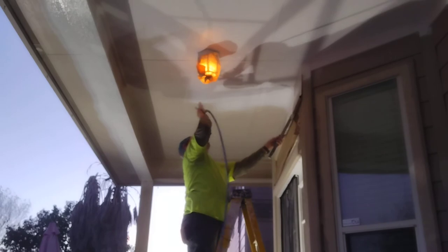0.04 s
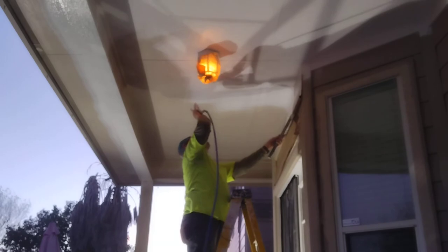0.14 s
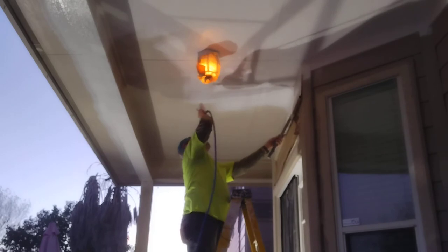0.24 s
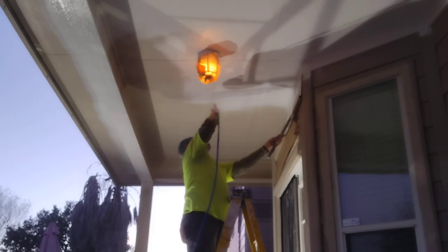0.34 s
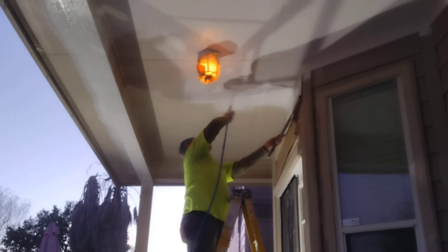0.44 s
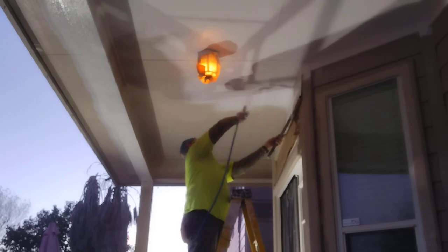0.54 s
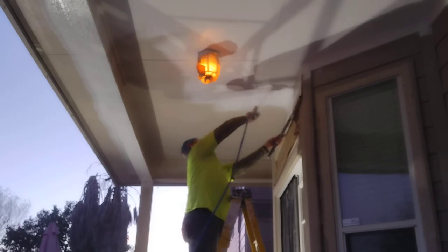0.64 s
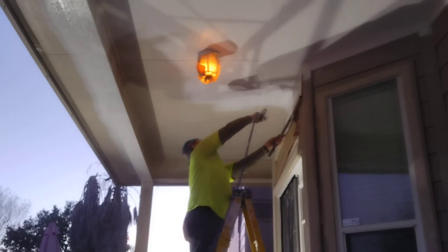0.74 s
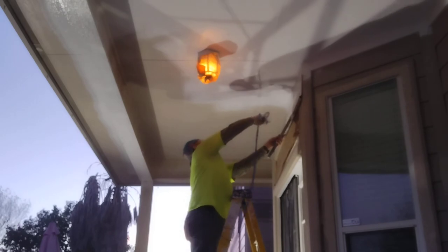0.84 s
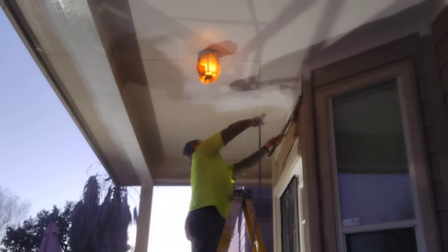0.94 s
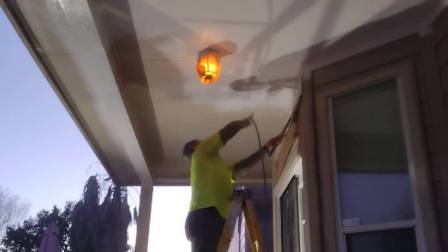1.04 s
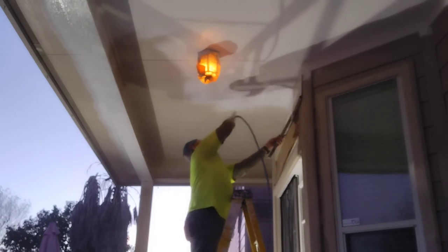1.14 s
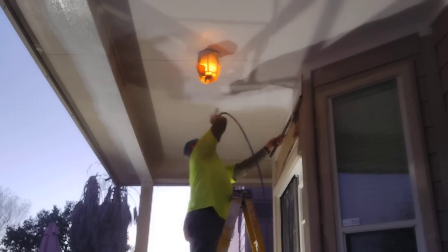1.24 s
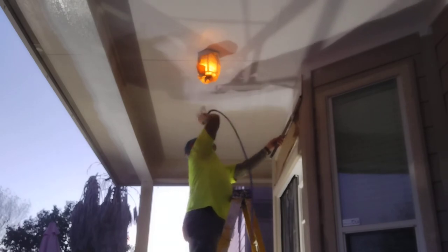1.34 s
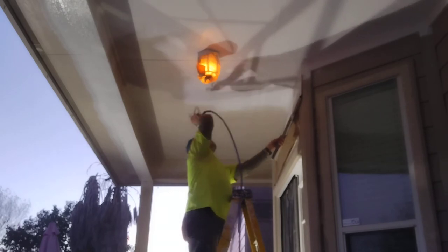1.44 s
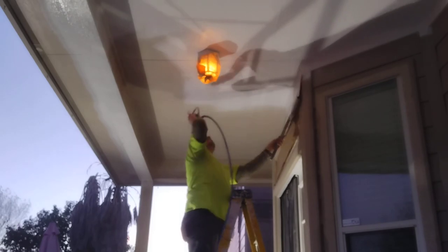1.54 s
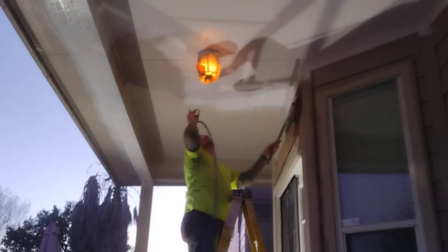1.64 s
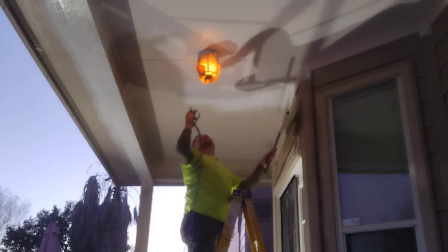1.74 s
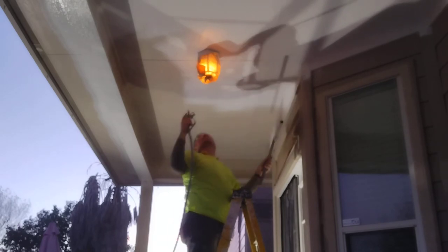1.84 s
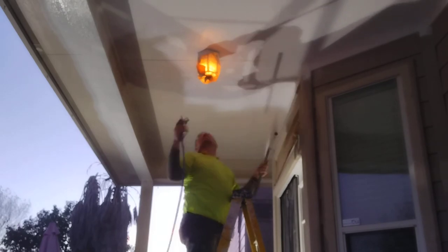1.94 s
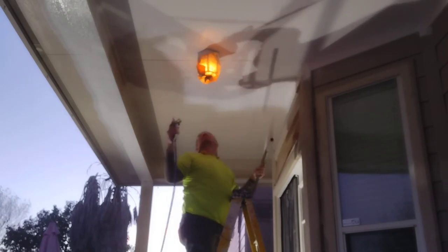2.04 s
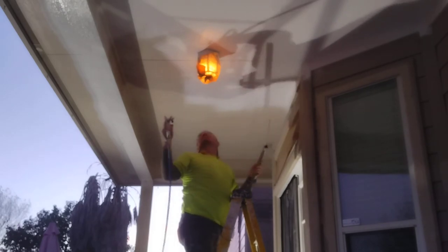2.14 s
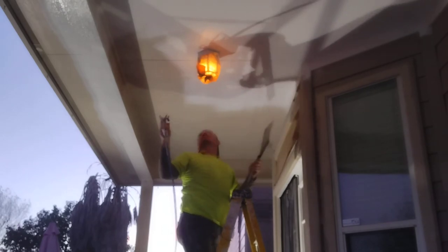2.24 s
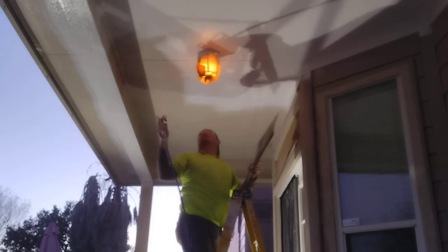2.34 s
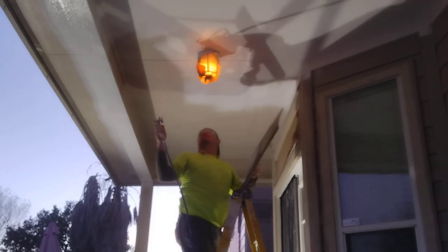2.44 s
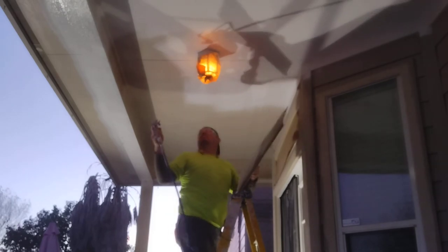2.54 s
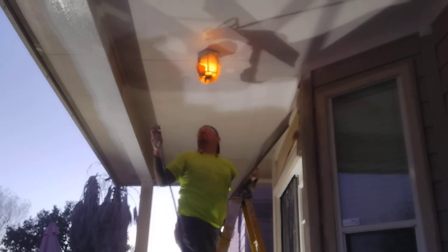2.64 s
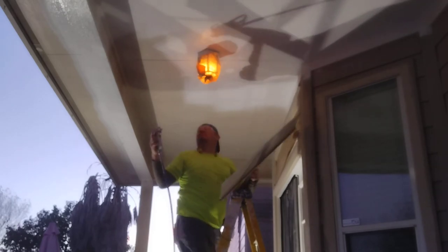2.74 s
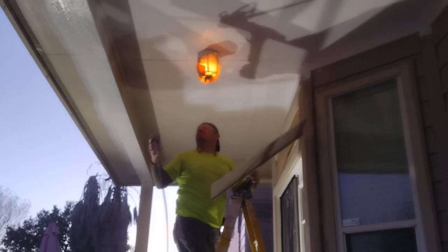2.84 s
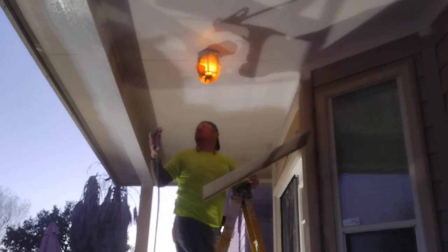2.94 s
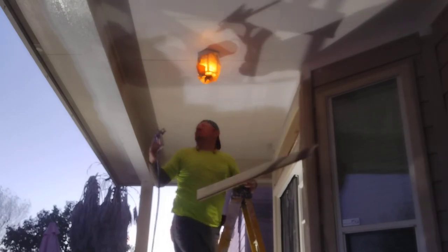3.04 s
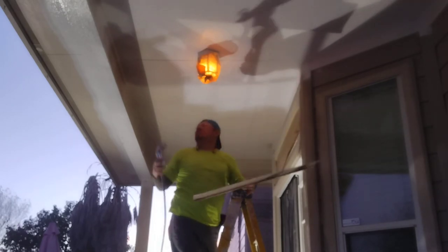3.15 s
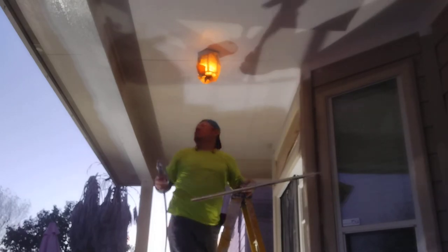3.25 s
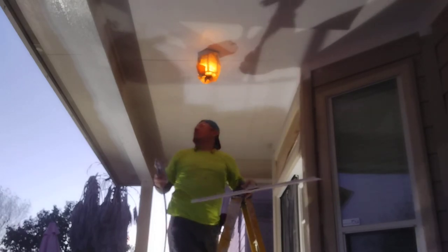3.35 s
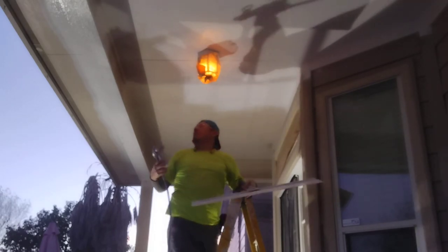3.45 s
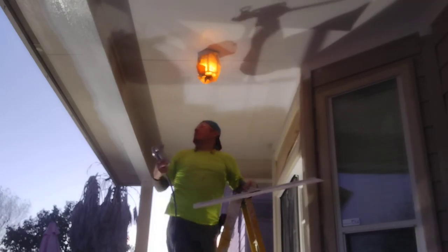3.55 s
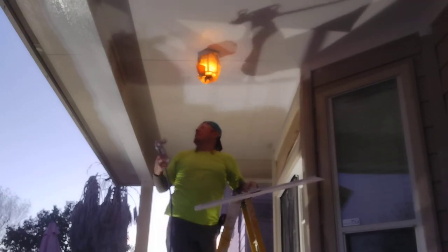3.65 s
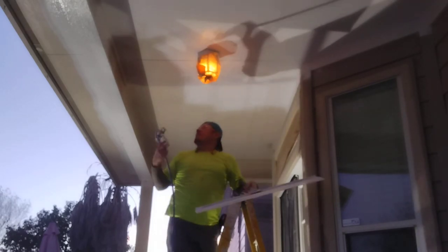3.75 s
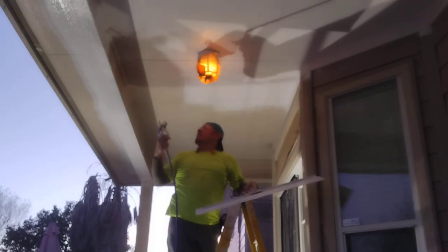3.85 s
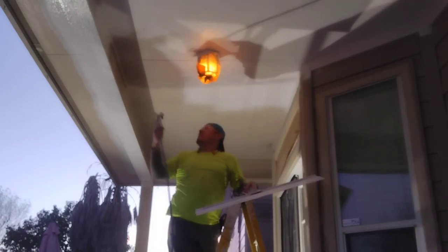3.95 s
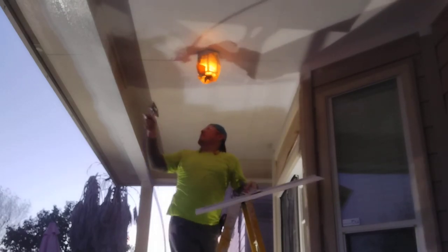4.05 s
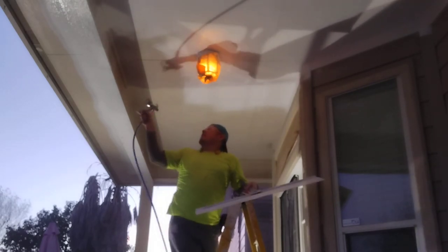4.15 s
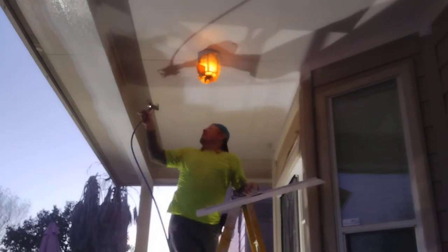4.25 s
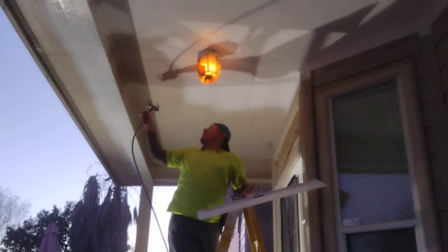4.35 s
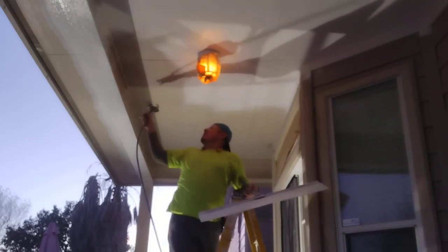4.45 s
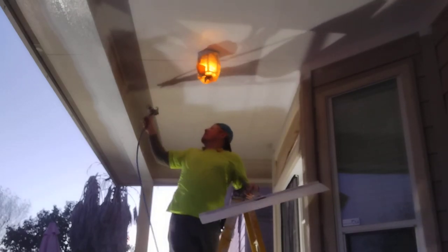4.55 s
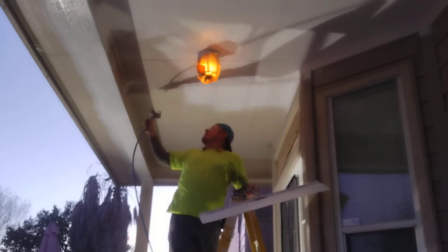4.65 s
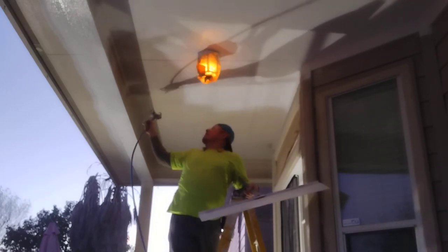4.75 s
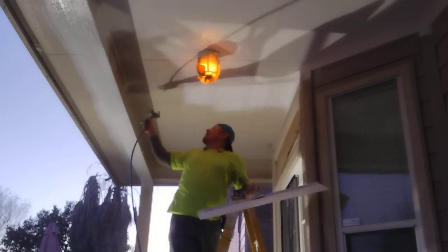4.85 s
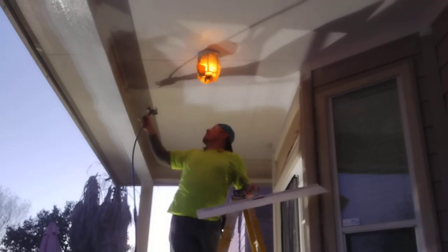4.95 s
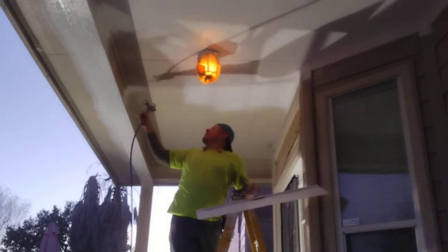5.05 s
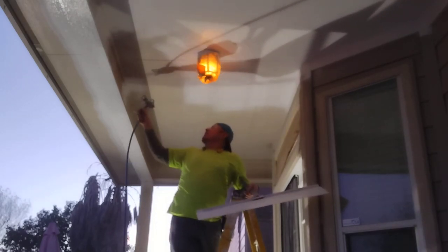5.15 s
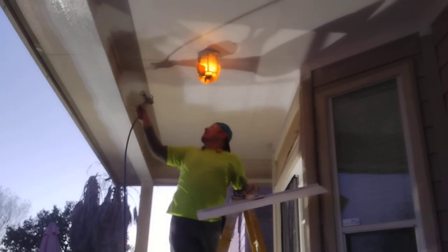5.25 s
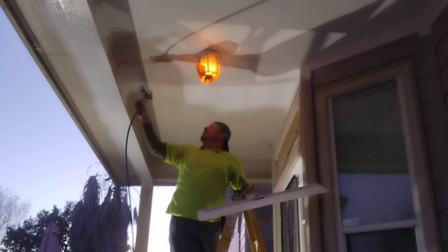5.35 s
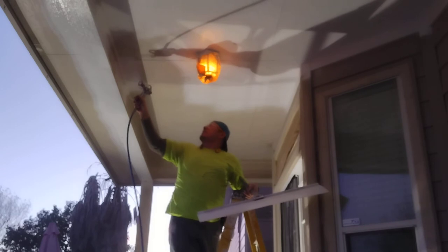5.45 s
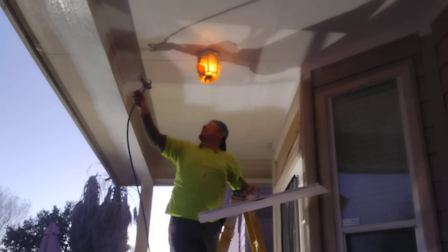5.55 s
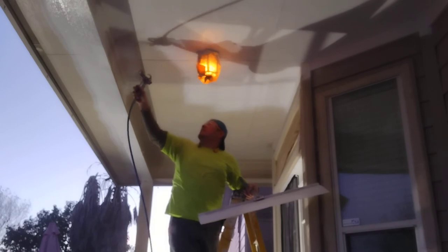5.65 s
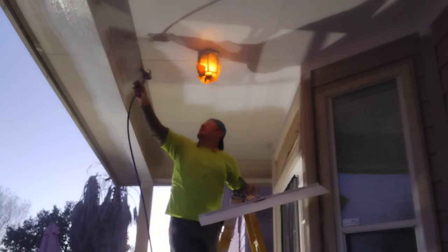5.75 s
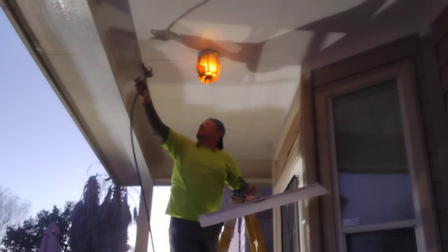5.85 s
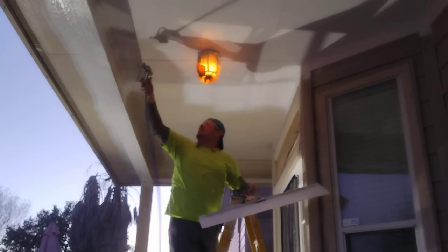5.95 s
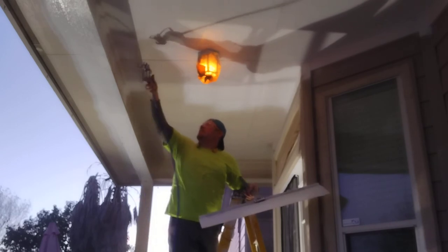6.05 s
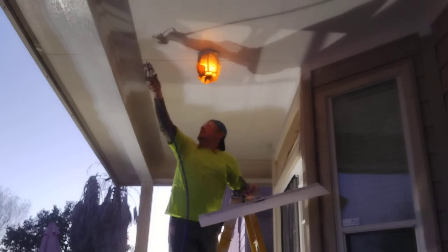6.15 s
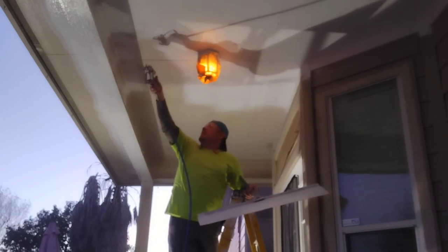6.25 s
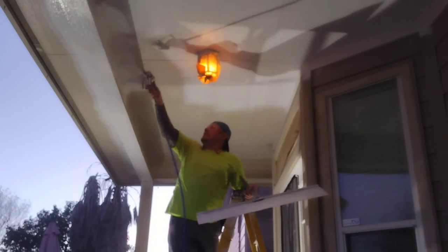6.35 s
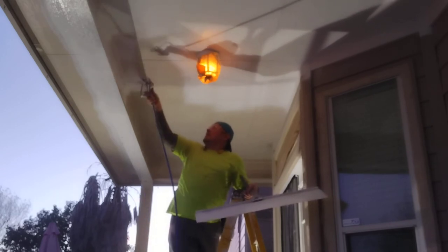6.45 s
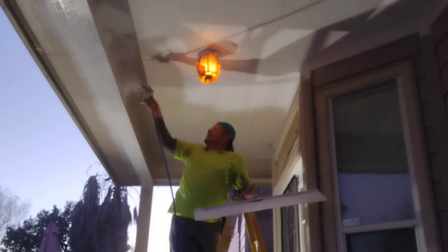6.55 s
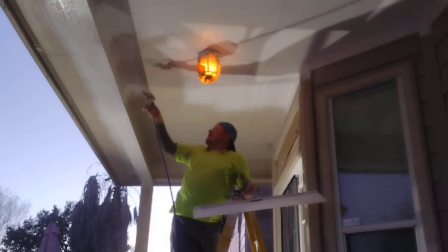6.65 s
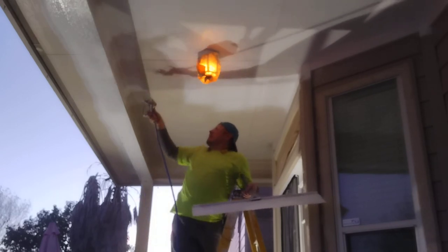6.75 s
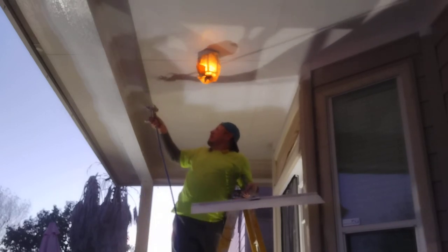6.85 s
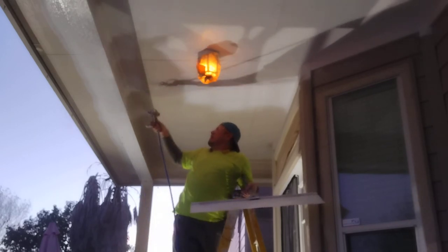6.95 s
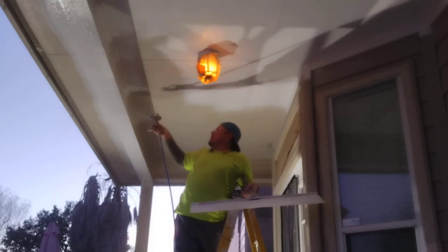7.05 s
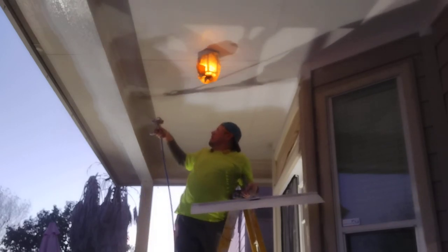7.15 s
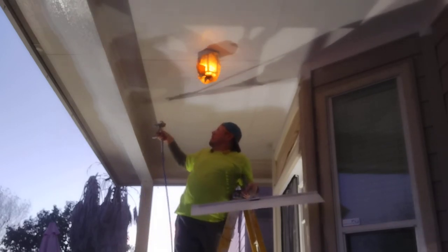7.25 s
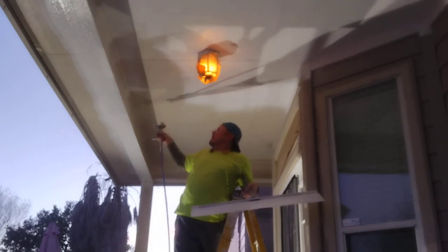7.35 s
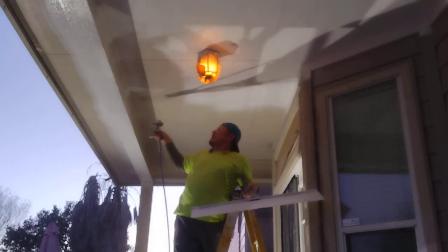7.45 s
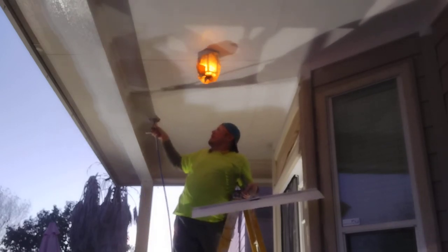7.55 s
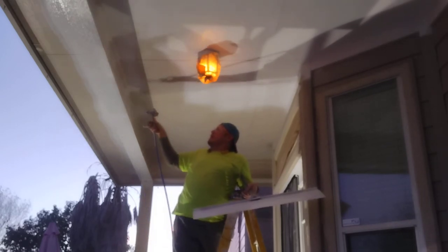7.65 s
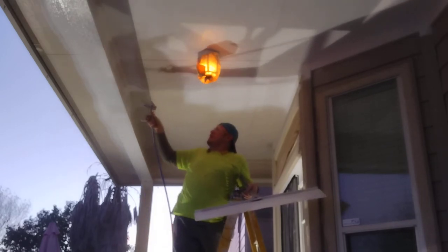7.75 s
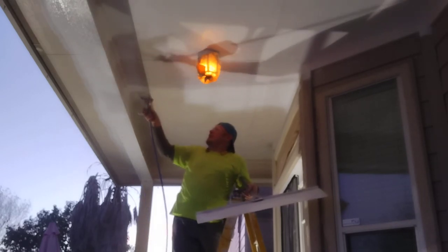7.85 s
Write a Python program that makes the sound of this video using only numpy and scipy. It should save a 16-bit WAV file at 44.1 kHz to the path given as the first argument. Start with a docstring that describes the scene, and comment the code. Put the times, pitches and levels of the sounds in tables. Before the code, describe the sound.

On an open porch, three quick, bright hisses come from a paint gun, backed by the uneven whine of an electric pump. Both stop, leaving quiet neighbourhood hum, a handful of hollow knocks from a handled spray shield and a dull bump on a ladder. The spraying returns for three stronger bursts and the pump restarts just behind it. The sound is in stereo, with slight short reflections from the ceiling and wall.

```python
"""An airless paint gun hisses across a wooden porch ceiling in three short bursts, its fan drumming on
the boards, while an electric piston pump labours a few metres away. The gun shuts and the pump coasts
to rest, valves clacking. In the pause the painter knocks and swings a spray shield and bumps the ladder.
At five seconds the first of three longer bursts opens, and the pump starts up again a moment late.
A quiet neighbourhood hums underneath throughout."""
import sys
import numpy as np
from scipy import signal
from scipy.fft import rfft, irfft
from scipy.io import wavfile
from scipy.ndimage import uniform_filter1d

SR = 44100
rng = np.random.default_rng(int(sys.argv[2]) if len(sys.argv) > 2 else 0)


def waveform_to_disk(signal):
    """Save audio, clipped to [-1, 1], as 16-bit WAV at the path in sys.argv[1]."""
    frames = np.transpose(np.atleast_2d(signal))
    scaled = np.clip(frames, -1, 1) * 32767
    samples = np.round(scaled).astype(np.int16)
    wavfile.write(sys.argv[1], SR, samples)


N = 348831

# Trigger pulls; lean tips the jet toward its lower hiss, pan is left minus right:
# open_s, shut_s, rise_s, jet_early_db, jet_late_db, lean_early_db, lean_late_db, pan_db, boards_db
TRIGGER_PULLS = [(-0.2, 0.131, 0.023, -32, -27.5, 8, -6.5, 2, -67),
                 (0.316, 0.833, 0.033, -28, -30, -5, -4.5, 1.5, -63.5),
                 (1.009, 1.469, 0.015, -32, -29.5, -4, -4.5, 1.5, -63.5),
                 (5.058, 5.901, 0.17, -26.5, -23.5, -7, -6, 1, -65.5),
                 (6.366, 7.281, 0.014, -24, -26, -7, -7.5, 1, -50.5),
                 (7.584, 8.0, 0.023, -27.5, -22.5, -11, -7, 1, -48)]
# Colour of the paint jet: pitch_hz, relative_db
JET_SPECTRUM = [(200, -49), (300, -36), (660, -26.5), (1000, -21.5), (1500, -22.5), (2130, -18.5),
                (3000, -18), (3900, -20), (4600, -17), (5500, -13), (6400, -12.5), (7800, -9.5), (8900, -7),
                (9800, -7.5), (11800, -6), (14000, -2), (15200, -0.5), (17500, 7.5)]
# Colour of the spray drumming on the ceiling: pitch_hz, relative_db
BOARD_SPECTRUM = [(24, -53.5), (40, -28), (129, -6.5), (162, -12), (194, 7.5), (310, -6), (371, -1.5),
                  (513, -4), (700, -16.5), (910, -42), (1540, -120)]
# Ceiling board resonances: pitch_hz, width_hz, relative_db
BOARD_MODES = [(144.5, 5.5, -4), (187, 9.7, -3.5)]

# One curve per pump run; frame growl and brush hiss ride on effort: time_s, effort_db, growl_db, brush_db
PUMP_RUNS = [
    [(0.0, -35.5, -7.5, -8), (0.15, -37.5, -4.5, -7), (0.25, -38.5, -2.5, -11.5), (0.34, -39, -1.5, -10.5),
     (0.5, -37, -10.5, -5), (0.7, -47.5, -6, 3), (0.8, -38.5, -8, -9), (1.1, -36.5, -7.5, -10),
     (1.3, -40.5, -7.5, -4), (1.49, -43.5, -8.5, -13), (1.62, -40, -7, -14), (1.72, -42, -4.5, -17),
     (1.9, -49.5, -3.5, -22.5), (1.98, -50, -11, -13), (2.09, -56.5, -8, -15), (2.17, -60, -1, -15),
     (2.22, -72.5, 6, -11), (2.36, -81.5, 0, -8)],
    [(5.42, -47.5, -10, -6), (5.62, -36.5, -8, -1), (5.92, -33.5, -5.5, -6), (6.17, -37.5, -1.5, -8),
     (6.255, -41.5, 0, -10), (6.36, -36, -9.5, -16.5), (6.7, -42, -6.5, -9), (6.98, -48, 3, -2),
     (7.1, -35.5, -5, -3), (7.38, -36.5, -2, -7), (7.48, -37, -4, -8.5), (7.58, -38.5, -6.5, -11.5),
     (7.7, -35.5, -3.5, -6.5), (7.91, -40.5, 4, -4.5)],
]
# Piston strokes: time_s, swell_db, growl_swell_db, whine_hz, whine_swell_db
PISTON_STROKES = [(0.021, 0.5, 25, 2020, 4), (0.076, 1, -3.5, 2060, 0), (0.167, 3.5, -1, 2164, 5),
                  (0.235, 2, 1, 2080, -4), (0.311, 4, 1, 1864, 9), (0.49, -0.5, 1.5, 2040, -12),
                  (0.82, 1, 3, 2040, 3), (0.971, 2.5, 6.5, 2013, 8), (1.13, 1.5, 3.5, 2031, -2),
                  (1.615, 3.5, 3, 2000, -6), (1.672, 4, 0.5, 1886, 2), (1.809, 6.5, 3, 2030, -11),
                  (1.89, 6.5, 6.5, 2030, 5), (2.12, 2.5, -1, 2024, 1), (2.29, 11, 2, 2122, 2),
                  (5.435, 0.5, -2.5, 2125, 11), (5.674, -1, 0.5, 2066, 9.5), (5.849, 1.5, 1, 2228, -10),
                  (5.95, 3, 1, 1855, 5.5), (6.05, 5, 2.5, 1870, 6), (6.146, 1.5, 1, 2260, 5.5),
                  (6.2, 4.5, 2.5, 2042, 2), (6.301, 4, 0, 1898, 6), (6.385, -0.5, 2.5, 2058, 1),
                  (7.27, 1.5, 0.5, 2110, -3), (7.366, 2.5, 1, 2302, 0.5), (7.408, 2.5, 3, 2073, 3.5),
                  (7.51, 1.5, 0, 1946, 7.5), (7.65, 4, 4, 2140, -11)]
# Colour of the motor and gears: pitch_hz, relative_db
MOTOR_SPECTRUM = [(21, -61), (35, -25.5), (129, -13.5), (166, -24.5), (257, -1), (329, -9), (373, -3),
                  (450, -5.5), (542, -12.5), (1170, -8.5), (1880, -4.5), (5000, -11.5), (6500, -42),
                  (11000, -120)]
# Pump casing resonances: pitch_hz, width_hz, relative_db
CASING_MODES = [(132, 20.5, -9.5), (380.7, 35, 1), (549.3, 38, -2.5), (875, 40, -2.5), (1268, 16, -1),
                (1478, 23, -0.5), (1812, 50, -1.5), (2354, 35, -6.5), (2645, 48, -4), (2852, 27, -5.5)]
# Colour of the motor brushes: pitch_hz, relative_db
BRUSH_SPECTRUM = [(2500, -16.5), (3800, -4.5), (5000, -9.5), (6370, -1), (8000, -4.5), (10500, -12.5),
                  (13000, -11), (17500, -18.5)]
# Narrow peaks in the brush hiss: pitch_hz, width_hz, relative_db
BRUSH_MODES = [(5060, 60, -12), (6370, 40, -11)]
# Pump valves seating: start_s, relative_db, thud_offset_db
VALVE_HITS = [(1.879, -27, -19), (2.094, -37, -20), (2.176, -56, 14), (2.2717, -49, -6), (5.4324, -50, -15),
              (6.973, -35, 14)]
# The gun's needle jerking open: start_s, clack_db, thump_db, thump_hz, t60_s
NEEDLE_HIT = (6.368, -30, -24, 300, .06)

# Knocks on shield and ladder:
# start_s, level_db, thud_offset_db, hollow_offset_db, crack_offset_db, pan_db, rise_s, t60_s
KNOCKS = [(2.519, -67.5, -10, 7, -20, 2, .001, 0.036), (2.649, -52.5, -13, -4, -2, 1, .008, 0.068),
          (2.817, -57, -10, -16, -17, 4, .005, 0.054), (2.876, -64.5, -2, -1, -15.5, 2, .004, 0.079),
          (3.006, -53.5, -5, -2, -5, 4, .006, 0.074), (3.039, -60, -5, -23.5, -7, 1, .004, 0.099),
          (3.316, -43.5, -18, 2, -30, 2, .0015, 0.15), (3.379, -45.5, -12, 1, -17, 3, .003, 0.12),
          (3.4694, -57, -6, -2, -8, 3, .003, 0.094), (3.7025, -69, 2, 2, -6, 4, .002, 0.1),
          (3.7912, -56.5, -2, 5, -13, 1, .003, 0.085), (4.2103, -72.5, 2, 9, -19, 4.5, .002, 0.23),
          (4.283, -62.5, -8, 5, -23, 3, .002, 0.11), (4.5294, -74, 2, 11, -7, 5, .002, 0.19),
          (4.565, -53, 5, 3, -14, 1, .005, 0.11), (4.584, -50.5, 2, -10, -24, 0, .002, 0.082),
          (4.6044, -67.5, 12, -8, -20, 3, .002, 0.062)]
# The shield's bright resonances: pitch_hz, width_hz, relative_db
SHIELD_MODES = [(1930, 610, 8), (2750, 270, 7.5), (3200, 190, 2), (4220, 340, -11), (5300, 380, -5)]
# The shield's hollow flexing: pitch_hz, width_hz, relative_db
FLEX_MODES = [(624, 470, -2), (990, 290, 1), (1290, 72, -2), (1480, 140, 0)]
# The shield swung through the air: time_s, level_db
SWISH_CURVE = [(3.05, -86), (3.156, -74.5), (3.382, -66.5), (3.51, -70), (3.62, -82)]
# A faint rustle after the ladder bump: time_s, level_db
RUSTLE_CURVE = [(4.598, -88), (4.72, -80), (4.88, -83), (5.0, -83.5)]
# The rubbed shield edge singing: pitch_hz, width_hz, relative_db
RUB_MODES = [(1460, 70, -3), (3300, 90, -1)]
# The swell of that rub: time_s, level_db
RUB_CURVE = [(3.13, -91), (3.2, -72.5), (3.255, -69), (3.28, -89)]
# Blows on the flat of the shield: start_s, level_db, t60_s
SHIELD_BLOWS = [(3.299, -54, 0.06), (3.3165, -34, 0.125), (3.381, -46, .06), (3.412, -51, 0.13)]
# Two close shield modes that beat when struck: pitch_hz, relative_db
BEATING_MODES = [(1395, -2), (1485, -3)]
# A small metal part clinking: start_s, level_db, pitch_hz, t60_s
CLINK = (2.818, -55, 2080, .025)
# Bumps against the ladder: start_s, level_db
LADDER_BUMPS = [(4.568, -43), (4.587, -43), (4.603, -47)]
# The ladder frame's ring: pitch_hz, relative_db, t60_s
LADDER_MODES = [(160, -1.5, .1), (217, -4, .12), (400, -8, .1), (713, -7, .12), (830, -9, .1)]

# Colour of the street bed: pitch_hz, relative_db
STREET_SPECTRUM = [(15, -65), (25, -40.5), (52, -11), (90, -4.5), (159, -8), (288, -12), (321, -24.5),
                   (349, -4.5), (433, -14.5), (600, -16.5), (900, -17.5), (1150, -21), (1780, -32),
                   (7000, -44.5), (12000, -48), (16500, -45)]
# Thin tones that enter late in the pause and stay: start_s, pitch_hz, level_db
THIN_TONES = [(4.6, 285, -75), (4.6, 398, -69.5), (4.65, 754, -79), (4.65, 888, -75.5), (4.7, 1416, -87),
              (4.76, 2353, -85)]
# Stereo image of the noises, 1 centred and 0 wide: pitch_hz, likeness
STEREO_LIKENESS = [(60, 0.98), (150, 0.97), (230, 0.97), (290, 0.94), (360, 0.92), (450, 0.75), (560, 0.55),
                   (700, 0.3), (900, 0.05), (1100, 0), (15000, 0)]
# Colour of the left capsule against the right: pitch_hz, pan_db
MIC_BALANCE = [(200, -.5), (330, .5), (450, -.5), (620, -2), (850, -.5), (1100, 1.5), (1500, .5), (3500, 0),
               (6500, -1), (8500, 0), (11000, 2), (14000, .5)]

SNAP_S, SNAP_SHARE = .006, .28   # the needle snaps open to a share of the jet, then pressure builds
SHUT_S, SHUT_DB_PER_S, SHUT_DULLING_DB_PER_S = .04, 520.5, 293   # the fan collapses, treble first
LEAN_TOP_HZ, LEAN_OCTAVES = 12000, .91   # the lean grows over this span below the top
GROWL_BELOW_HZ, BRUSH_ABOVE_HZ = 650, 3400
STROKE_S, WHINE_S, GROWL_LEAD_S = .026, .034, .05   # half widths of two swells; the growl's head start
REVERSAL_DB, REVERSAL_LEAD_S, REVERSAL_S = -5, .008, .006   # gears hush as the piston turns
WHINE_REST_HZ, WHINE_SAG_HZ_PER_S, WHINE_WANDER_HZ = 2085, 2000, 30
WHINE_DB, WHINE_GAP_DB = -8.5, -7   # against the pump's effort; a further dip between strokes
WHINE_BLUR_HZ, WHINE_JITTER_RAD, WHINE_FLUTTER_DB = 50, 1.3, 4.5
UPPER_MESH_RATIO, UPPER_MESH_DB = 1.47, -11
CASING_WAVER_DB, CASING_STROKE_SHARE = 3, .6   # the casing rings out more on a strong stroke
STREET_DB = -63
PORCH_T60_S, WALL_CUT_HZ, REFLECTIONS_DB = .26, 4150, -8
DIRECT_SHARE, DIRECT_LAG_SAMPLES, LEFT_LAG_SAMPLES = .4, 11, 6
TIME_S = np.arange(N) / SR


def spray():
    """The paint fan tears into droplets with a bright hiss and drums on the boards it hits."""
    jet, lean_db, pan_db, boards = trigger()
    lean = lambda hz: (lean_db + 8) * np.clip(np.log2(LEAN_TOP_HZ / hz), 0, LEAN_OCTAVES)
    hiss = banded_noise(JET_SPECTRUM, (250, 18000), (10000, 15500), 1.3, shade_db=lean, slow_share=.3)
    # The duller hiss spreads round the porch, so it sits nearer the centre.
    dull = signal.sosfilt(signal.butter(1, 6860, fs=SR, output="sos"), hiss)
    hiss = dull * pan(.35 * pan_db) + (hiss - dull) * pan(2 * pan_db)
    drumming = banded_noise(BOARD_SPECTRUM, (40, 900), (100, 300), flicker_db=-1)
    drumming += .8 * rings(stereo_white(150), BOARD_MODES)
    return jet * hiss + boards * drumming


def trigger():
    """Pressure rises on each pull, drifts while held and collapses on release."""
    jet, lean_db, pan_db, boards = np.zeros((4, N))
    for open_s, shut_s, rise_s, early_db, late_db, *lean_ends_db, side_db, boards_db in TRIGGER_PULLS:
        on = (TIME_S >= open_s) & (TIME_S < shut_s + SHUT_S)
        now = TIME_S[on]
        held_s, released_s = now - open_s, np.maximum(now - shut_s, 0)
        snap = 1 - np.exp(-held_s / SNAP_S)
        pressure = 1 - (1 - SNAP_SHARE) * np.exp(-held_s / rise_s)
        level_db = np.interp(now, [open_s, shut_s], [early_db, late_db]) - SHUT_DB_PER_S * released_s
        jet[on] = snap * pressure * from_db(level_db)
        lean_db[on] = np.interp(now, [open_s, shut_s], lean_ends_db) + SHUT_DULLING_DB_PER_S * released_s
        pan_db[on], boards[on] = side_db, from_db(boards_db)
    return jet, lean_db, pan_db, uniform_filter1d(boards, size=900)


def pump():
    """Gear noise swells with each stroke and rings in the casing; the gears whine, the brushes hiss."""
    gate, (effort_db, growl_db, brush_db) = gated_curves(PUMP_RUNS)
    swell_db, growl_swell_db, bend_hz, whine_swell_db = piston_strokes()

    def shade_db(hz):
        frame_db = (growl_db + growl_swell_db + 3) * (hz < GROWL_BELOW_HZ)
        return frame_db + (brush_db + 6) * (hz > BRUSH_ABOVE_HZ)

    motor = banded_noise(MOTOR_SPECTRUM, (35, 6500), (1200, 3200), 2, shade_db=shade_db, slow_share=.25)
    low, high = stereo_white(430), stereo_white(1500)
    casing = np.zeros((2, N))
    for hz, width_hz, mode_db in CASING_MODES:
        ringing = resonance(low if hz < GROWL_BELOW_HZ else high, hz, width_hz)
        accent_db = CASING_STROKE_SHARE * swell_db * (hz > GROWL_BELOW_HZ)
        casing += from_db(mode_db + shade_db(hz) + accent_db + CASING_WAVER_DB * drift(8)) * ringing
    whine = from_db(WHINE_DB + whine_swell_db) * gear_whine(bend_hz)
    brushes = banded_noise(BRUSH_SPECTRUM, (3000, 18000), (5000, 15500), flicker_db=2.5)
    brushes += sum(from_db(db) * resonance(high, hz, width_hz) for hz, width_hz, db in BRUSH_MODES)
    machine = from_db(-4.5) * motor + from_db(-12) * casing + whine + from_db(brush_db) * brushes
    return gate * from_db(effort_db + swell_db) * machine


def piston_strokes():
    """Each stroke growls, then swells the noise and bends the whine, which sags under the load."""
    t = TIME_S[::64]
    stroke_s, swell_db, growl_db, whine_hz, whine_db = np.array(PISTON_STROKES).T[:, :, None]
    bell = lambda centre_s, width_s: np.exp(-.5 * ((t - centre_s) / width_s) ** 2)
    swell = (swell_db * bell(stroke_s, STROKE_S)).sum(axis=0)
    growl = (growl_db * bell(stroke_s - GROWL_LEAD_S, STROKE_S)).sum(axis=0)
    valve_s = np.array(VALVE_HITS)[:, :1]
    reversal = REVERSAL_DB * bell(valve_s - REVERSAL_LEAD_S, REVERSAL_S).sum(axis=0)
    held = np.exp(-.5 * ((t - stroke_s) / WHINE_S) ** 4)
    crossfade = held / np.maximum(held.sum(axis=0), 1)
    bend = (crossfade * (whine_hz - WHINE_REST_HZ - WHINE_SAG_HZ_PER_S * (t - stroke_s))).sum(axis=0)
    whine = (crossfade * whine_db).sum(axis=0) + WHINE_GAP_DB * (1 - held.max(axis=0))
    # The low end follows its own growl in place of the swell.
    return [np.interp(TIME_S, t, curve) for curve in (swell + reversal, growl - swell, bend, whine)]


def gear_whine(bend_hz):
    """Two gear meshes sing at a never quite steady speed; uneven teeth blur each note."""
    def mesh(phase):
        flutter = from_db(WHINE_FLUTTER_DB * drift(WHINE_BLUR_HZ))
        return np.sqrt(2) * flutter * np.sin(phase + WHINE_JITTER_RAD * drift(WHINE_BLUR_HZ))

    phase = 2 * np.pi * np.cumsum(WHINE_REST_HZ + bend_hz + WHINE_WANDER_HZ * drift(10)) / SR
    return np.array([mesh(phase) + from_db(UPPER_MESH_DB) * mesh(UPPER_MESH_RATIO * phase) for _ in "LR"])


def valves_and_needle():
    """Pump valves seat with a clack and a thud; the needle clacks once and thumps the gun body."""
    clack = rms_one(band(stereo_white(2500), 1700, 3800))
    thud = rms_one(band(stereo_white(300), 140, 1250))
    out = np.zeros((2, N))
    for start_s, level_db, thud_db in VALVE_HITS:
        strike(out, [(clack, 0), (thud, thud_db)], start_s, t60_s=.1, gain=from_db(level_db - 9))
    start_s, clack_db, thump_db, thump_hz, t60_s = NEEDLE_HIT
    strike(out, [(clack, clack_db), (tone(thump_hz), thump_db)], start_s, t60_s)
    return out


def shield_handling():
    """The shield swishes and rubs as it swings; knocks rattle its modes with a crack and a thud."""
    white = stereo_white(1500)
    body = band(rings(white, SHIELD_MODES), 1400, 8400)
    hollow = band(rings(stereo_white(640), FLEX_MODES), 390, 2500)
    crack = rms_one(band(white, 2280, 11600))
    thud = rms_one(band(stereo_white(200), 125, 250))
    gate, (swish_db,) = gated_curves([SWISH_CURVE, RUSTLE_CURVE])
    out = gate * from_db(swish_db) * (.37 * body + 1.7 * hollow + .5 * crack)
    gate, (rub_db,) = gated_curves([RUB_CURVE])
    out += gate * from_db(rub_db) * rings(white, RUB_MODES)
    for start_s, level_db, thud_db, hollow_db, crack_db, pan_db, rise_s, t60_s in KNOCKS:
        layers = [(body, 0), (thud, thud_db), (hollow, hollow_db), (crack, crack_db)]
        strike(out, layers, start_s, t60_s, from_db(level_db) * pan(pan_db), rise_s)
    return out


def clink_and_shield_blows():
    """A small metal part clinks, then blows on the flat of the shield set two close modes beating."""
    out = np.zeros((2, N))
    start_s, level_db, hz, t60_s = CLINK
    strike(out, [(tone(hz), level_db)], start_s, t60_s)
    spread_rad = np.array([[0], [np.pi / 2]])
    beating = sum(from_db(db) * tone(hz, phase_rad=spread_rad) for hz, db in BEATING_MODES)
    for start_s, level_db, t60_s in SHIELD_BLOWS:
        strike(out, [(beating, level_db)], start_s, t60_s, pan(3))
    return out


def ladder():
    """Each bump rings the low modes of the ladder frame."""
    out = np.zeros((2, N))
    for start_s, level_db in LADDER_BUMPS:
        for hz, mode_db, t60_s in LADDER_MODES:
            strike(out, [(tone(hz, start_s), mode_db)], start_s, t60_s, from_db(level_db))
    return out


def porch(x):
    """Six echo loops a side between ceiling, floor and wall, duller on every round."""
    out = np.zeros((2, N))
    pole = np.exp(-2 * np.pi * WALL_CUT_HZ / SR)
    for k, lag in enumerate((rng.uniform(.012, .035, 12) * SR).astype(int)):
        loop, state = x[k % 2].copy(), [0.]
        feedback = from_db(-60 * lag / SR / PORCH_T60_S)
        for i in range(lag, N, lag):
            echo, state = signal.lfilter([feedback * (1 - pole)], [1, -pole], loop[i - lag:i], zi=state)
            loop[i:i + lag] += echo[:N - i]
        out[k % 2] += (loop - x[k % 2]) * (-1) ** (k // 2)
    return band(out, 425, 21000)   # the open sides let the bass escape


def street():
    """A bed of distant traffic and microphone hiss, joined by a few thin, wavering tones."""
    out = from_db(STREET_DB) * banded_noise(STREET_SPECTRUM, (25, 18000), (50, 1000), flicker_db=.4)
    for start_s, hz, level_db in THIN_TONES:
        fade_in = np.clip((TIME_S - start_s) / .099, 0, 1)
        out += np.sqrt(2) * fade_in * from_db(level_db + 2 * drift(20)) * tone(hz)
    return out


def across_microphones(x):
    """Part of the upper mids is direct sound, reaching the left microphone just after the right."""
    mids = band(x, 1500, 2700)
    power = uniform_filter1d(mids ** 2, size=4096) + 1e-14
    late = np.roll(mids[1], DIRECT_LAG_SAMPLES) * np.sqrt(power[0] / power[1])
    left = x[0] + (np.sqrt(1 - DIRECT_SHARE ** 2) - 1) * mids[0] + DIRECT_SHARE * late
    return np.array([left, x[1]])


def strike(out, layers, start_s, t60_s, gain=1, rise_s=.0014):
    """Mix (sound, level_db) layers into out under one fast attack and decay."""
    start = round(start_s * SR)
    t = TIME_S[:min(SR // 3, N - start)]
    envelope = (1 - np.exp(-t / rise_s)) * from_db(-60 * t / t60_s)
    span = slice(start, start + len(t))
    for sound, level_db in layers:
        out[:, span] += gain * from_db(level_db) * envelope * sound[:, span]


def banded_noise(spectrum, span_hz, unity_hz, flicker_db, shade_db=lambda hz: 0, slow_share=.73):
    """Flickering stereo bands over span_hz; rms near 1 within unity_hz before shade_db rides them."""
    low_hz, high_hz = span_hz
    edges = np.geomspace(low_hz, high_hz, int(2.5 * np.log2(high_hz / low_hz)) + 2)
    white, shared_drift = rng.standard_normal((2, 2, N)), drift(8.3)
    out, power = np.zeros((2, N)), 0
    for k, (low, high) in enumerate(zip(edges, edges[1:])):
        hz = np.sqrt(low * high)
        level_db = at_hz(spectrum, hz)
        flicker = slow_share * shared_drift + drift(29)
        noise = mid_side(*band(white[k % 2], low, high), hz)
        out += from_db(level_db + shade_db(hz) + flicker_db * flicker) * noise
        overlap_hz = max(0, min(high, unity_hz[1]) - max(low, unity_hz[0]))
        power += 2 * overlap_hz / SR * from_db(2 * level_db)
    return out / np.sqrt(power)


def stereo_white(hz):
    """White noise with the stereo width that belongs to this pitch."""
    return mid_side(*rng.standard_normal((2, N)), hz) / np.sqrt(2)


def mid_side(mid, side, hz):
    """Spread two noises to left and right: centred for a low pitch, wide for a high one."""
    likeness = at_hz(STEREO_LIKENESS, hz)
    return np.sqrt(1 + likeness) * mid + np.sqrt(1 - likeness) * side * [[1], [-1]]


def rings(white, modes):
    """Noise through a set of resonances; rms 1."""
    return rms_one(sum(from_db(db) * resonance(white, hz, width_hz) for hz, width_hz, db in modes))


def resonance(x, hz, width_hz):
    """Two-pole resonance; rms 1."""
    r = np.exp(-np.pi * width_hz / SR)
    return rms_one(signal.lfilter([1, 0, -1], [1, -2 * r * np.cos(2 * np.pi * hz / SR), r * r], x))


def drift(rate_hz):
    """A smooth random wobble; rms about 1."""
    hop, settle = 40, 2000
    r = np.exp(-2 * np.pi * rate_hz * hop / SR)
    slow = signal.lfilter([1], [1, -2 * r, r * r], rng.standard_normal(N // hop + settle + 2))[settle:]
    return np.interp(np.arange(N) / hop, np.arange(len(slow)), rms_one(slow))


def gated_curves(tables):
    """A soft gate, open during each table, and the tables' columns as fader curves."""
    is_open = sum((TIME_S >= rows[0][0]) & (TIME_S <= rows[-1][0]) for rows in tables)
    times_s, *columns = np.concatenate(tables).T
    return uniform_filter1d(is_open * 1., size=200), [np.interp(TIME_S, times_s, c) for c in columns]


def tone(hz, start_s=0, phase_rad=0):
    """A steady sine whose phase counts from start_s."""
    return np.atleast_2d(np.sin(2 * np.pi * hz * (TIME_S - start_s) + phase_rad))


def band(x, low_hz, high_hz):
    """Butterworth band-pass."""
    return signal.sosfilt(signal.butter(2, [low_hz, high_hz], "band", fs=SR, output="sos"), x)


def at_hz(spectrum, hz):
    """Read a spectrum on a log-frequency axis."""
    pitches_hz, values = np.transpose(spectrum)
    return np.interp(np.log(hz), np.log(pitches_hz), values)


def pan(pan_db):
    """Left and right gains, the left louder by pan_db."""
    return from_db(pan_db * np.array([[.5], [-.5]]))


def from_db(db):
    """Decibels to gain."""
    return 10 ** (db / 20)


def rms_one(x):
    """Scale to rms 1."""
    return x / np.sqrt(np.mean(x ** 2) + 1e-20)


def scene():
    """The work up front with the porch's reflections, over the street bed."""
    denormal_guard = 1e-9 * rng.standard_normal((2, N))   # inaudible noise that keeps the filters fast
    work = spray() + pump() + valves_and_needle() + shield_handling() + clink_and_shield_blows() + ladder()
    near = across_microphones(work + denormal_guard)
    return near + from_db(REFLECTIONS_DB) * porch(near) + street()


def record(dry):
    """The two capsules differ a little in colour; the top end rolls off steeply."""
    bin_hz = np.arange(1, N // 2 + 2) * SR / N
    heard = irfft(rfft(dry) * pan(at_hz(MIC_BALANCE, bin_hz)), N)
    heard[0] = np.roll(heard[0], LEFT_LAG_SAMPLES)   # the left capsule sits farther away
    rolled_off = signal.sosfilt(signal.ellip(12, .3, 48, 15740, fs=SR, output="sos"), heard)
    return signal.sosfilt(signal.cheby2(16, 45, 16860, fs=SR, output="sos"), rolled_off)


dry = scene()
out = record(dry)
waveform_to_disk(out)
```